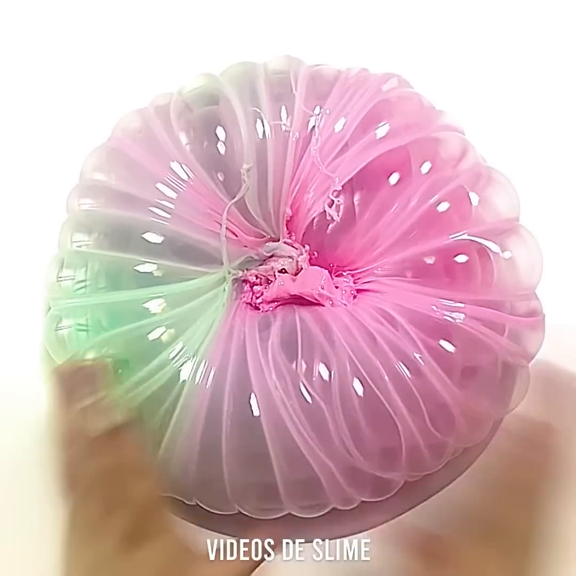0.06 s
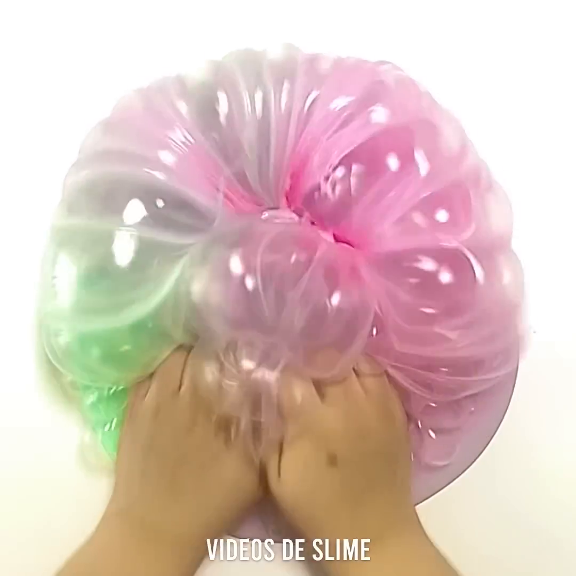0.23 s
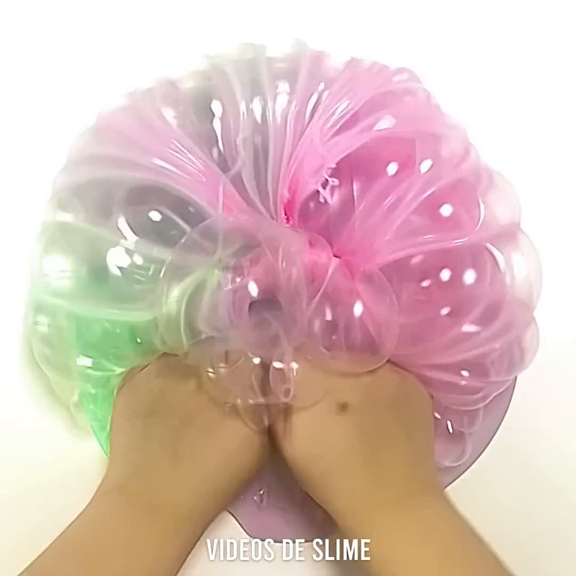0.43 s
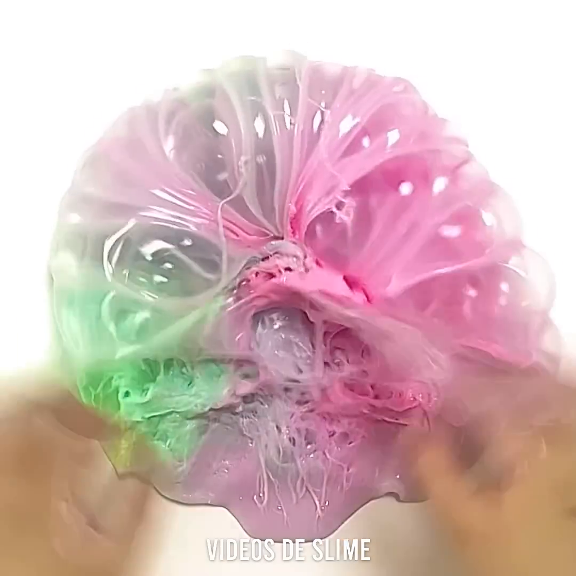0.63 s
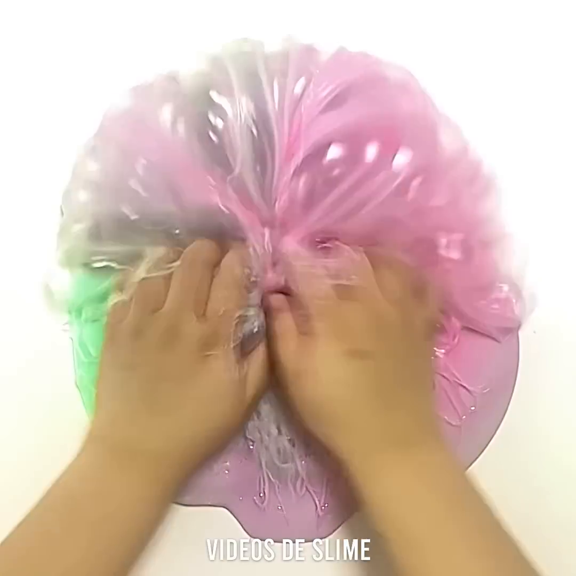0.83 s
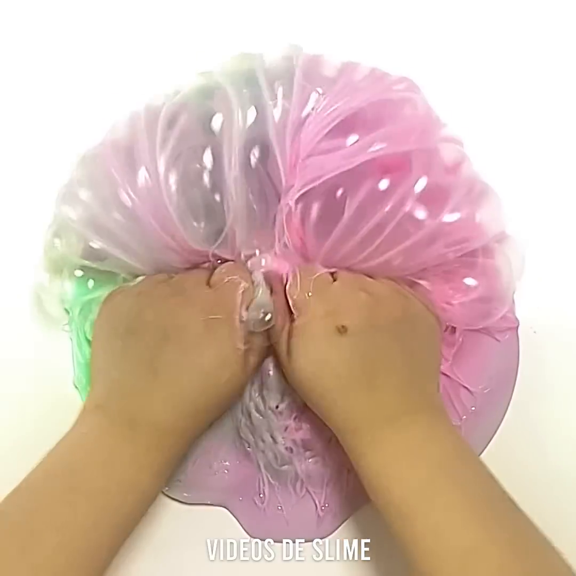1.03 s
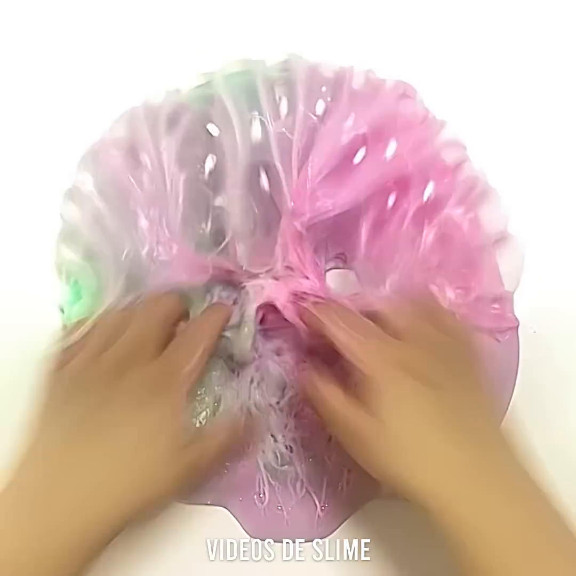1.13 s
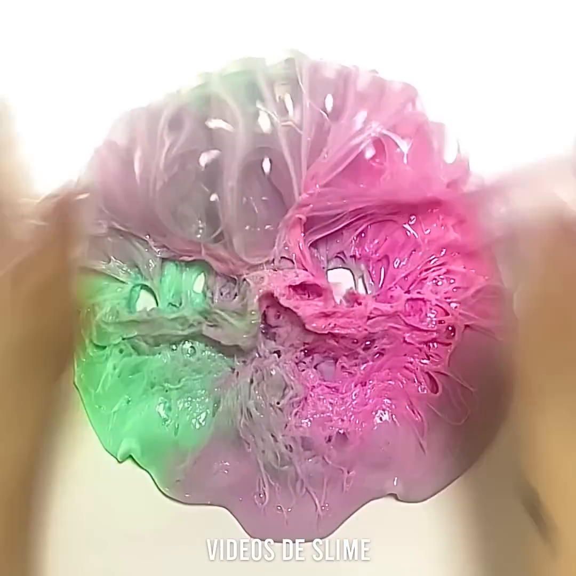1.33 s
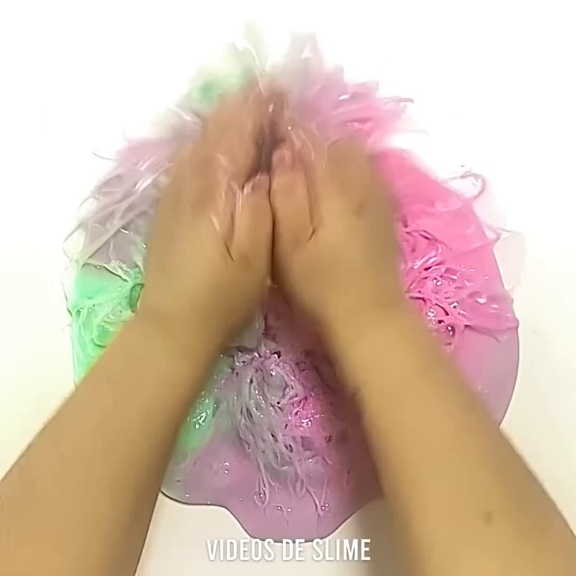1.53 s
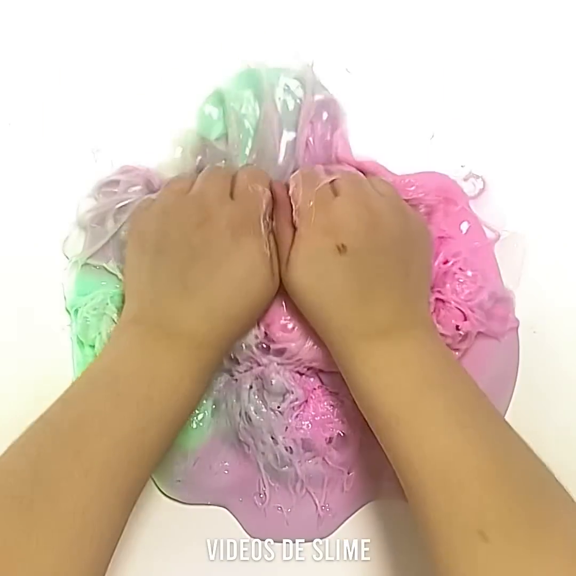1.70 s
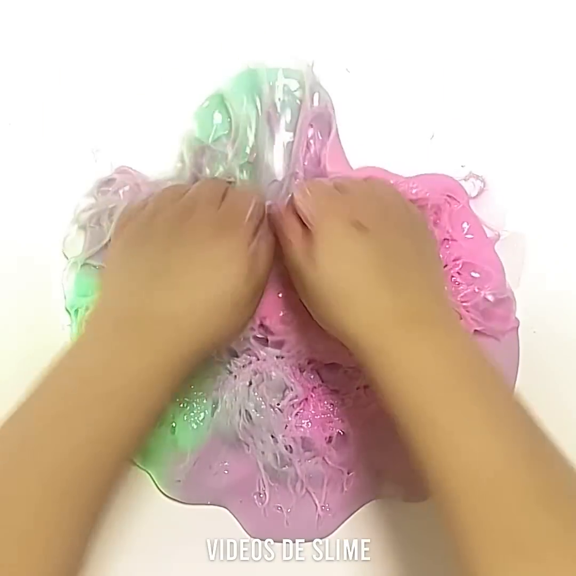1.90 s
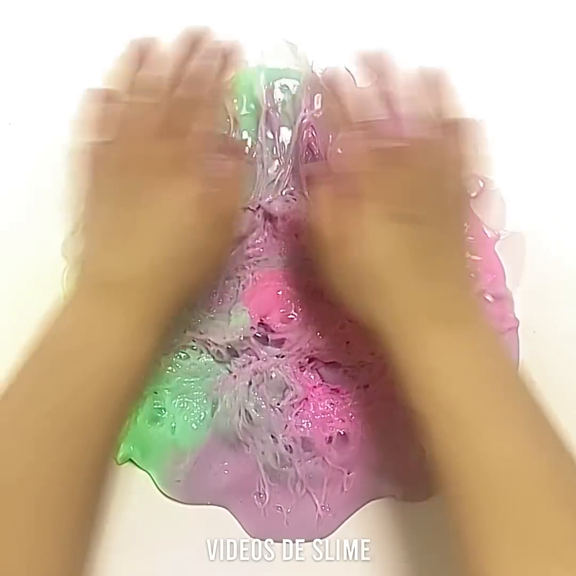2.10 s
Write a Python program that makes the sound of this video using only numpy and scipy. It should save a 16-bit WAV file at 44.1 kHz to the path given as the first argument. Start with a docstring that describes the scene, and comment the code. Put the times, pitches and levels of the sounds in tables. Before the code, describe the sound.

Air-filled slime is squeezed three times by hands on a table, each squeeze a dense wet crackle of bursting bubbles with snappy pops and brief squeaks, over dull low rumble; close microphone, small room.

```python
"""Slime squeezed three times by two hands on a table, close to the microphone in a small room.
Each squeeze bursts swarms of short, sinking bubble rings, with single louder pops on top.
Air pockets gulp on a downward glide, and escaping air squeaks as wavering tones.
Low noise rumbles as the mass pushes on the table; thuds and low knocks sound from the table.
A noise-like room tail follows the slime and table, over a faint steady background noise."""
import sys
import numpy as np
from scipy import signal
from scipy.fft import rfft, irfft
from scipy.io import wavfile
from scipy.ndimage import uniform_filter1d

SR = 44100
rng = np.random.default_rng(int(sys.argv[2]) if len(sys.argv) > 2 else 0)


def pcm_store(signal):
    """Save signal as 16-bit PCM."""
    levels = np.round(np.clip(np.atleast_2d(signal), -1, 1) * 32767)
    wavfile.write(sys.argv[1], SR, levels.astype(np.int16).T)


N = 94815

# crackle of each squeeze, before size trim: [t/s, level/dB of large, medium, small, finest bubbles]
SQUEEZE_1 = [(0.11, -82.5, -80.5, -83, -84), (0.19, -63.5, -58.5, -59.5, -68.5),
             (0.21, -47.5, -39.5, -49, -57.5), (0.238, -32.5, -35.5, -36.5, -41),
             (0.275, -33.5, -26, -37, -43.5), (0.289, -32.5, -35.5, -33.5, -38),
             (0.305, -44, -29.5, -37.5, -41), (0.328, -42.5, -23, -31.5, -39), (0.338, -39, -35, -39, -45),
             (0.362, -54.5, -37.5, -39, -47), (0.37, -43.5, -36, -53, -65), (0.398, -61.5, -41, -39, -49.5),
             (0.42, -55.5, -81, -78.5, -64), (0.455, -67, -47, -57, -61), (0.49, -53.5, -44, -46, -53.5),
             (0.54, -58.5, -50, -58.5, -60.5), (0.62, -73, -67.5, -73.5, -71)]
SQUEEZE_2 = [(0.777, -103, -76, -76.5, -99.5), (0.807, -62.5, -64, -64, -60), (0.835, -61, -55, -55, -60),
             (0.864, -49, -40.5, -51, -56), (0.886, -32.5, -31.5, -30.5, -37.5),
             (0.898, -47, -35, -41, -46), (0.909, -48.5, -32, -27, -35), (0.924, -28.5, -36.5, -39, -41),
             (0.931, -33.5, -31.5, -29.5, -43.5), (0.959, -37, -31, -34.5, -34),
             (0.977, -62, -39, -41, -50), (0.994, -50, -35, -35, -29.5), (1.024, -82, -59, -50.5, -52.5),
             (1.075, -78, -52.5, -56.5, -64), (1.106, -53.5, -44.5, -50, -55),
             (1.159, -64, -52.5, -60.5, -61.5), (1.201, -67.5, -61, -65.5, -75)]
SQUEEZE_3 = [(1.41, -90, -72.5, -78, -82), (1.449, -69, -67.5, -65.5, -72.5),
             (1.511, -89, -64.5, -63.5, -63.5), (1.559, -32, -58, -49.5, -51.5),
             (1.569, -64, -60, -62.5, -67), (1.621, -50.5, -53, -47.5, -55.5),
             (1.654, -42, -39.5, -42, -45), (1.683, -36, -30, -27.5, -44), (1.714, -44.5, -39.5, -37, -40),
             (1.755, -47.5, -38.5, -35, -34), (1.78, -44, -36.5, -35, -59.5),
             (1.797, -66, -44, -45.5, -45.5), (1.815, -66.5, -54, -59, -70),
             (1.875, -66, -57.5, -61.5, -66), (1.908, -56.5, -42.5, -41, -53),
             (1.929, -65.5, -51.5, -53.5, -52.5), (2.009, -70, -66.5, -69, -75.5)]
FADE_DB_PER_S = 117  # the sound rises into each squeeze and dies away after it, at this rate
# bubble sizes, large to finest:
# [lowest f/Hz, highest f/Hz, burst rate/(1/s), strength spread/dB, time to peak/cycles, trim/dB]
BUBBLE_SIZES = [(281, 945, 740, 3.5, 0.65, 1.5), (925, 2400, 1900, 1, 1.33, 0.5),
                (2606, 5730, 3100, 4, 1.3, 2), (5880, 15000, 3700, 2.5, 1.3, 1.5)]
# relative strength of a burst by its pitch: [f/Hz, level/dB]
BURST_COLOUR = [(260, -10), (450, -1), (900, -2), (1400, 0.5), (2400, -2), (3400, -3), (6000, -6),
                (8500, -6), (10500, -9), (15000, -18.5)]
BURST_SAG = 0.11  # a burst starts this share sharp and sinks towards half this share flat
# one tear sets off bubbles of all sizes, over a steady bed
CLUMPS_PER_S, CLUMP_DECAY_S, CLUMP_BED = 200, 0.0029, 0.74

# single loud bubbles, before the pop and snap trims:
# [t/s, ring level/dB, f/Hz, length scale/s, film snap level/dB]
POPS = [(.163, -48, 3270, .0009, -56), (.209, -33, 1340, .002, -48), (.2295, -26, 1900, .001, -38),
        (.234, -17, 1080, .0006, -27), (.2712, -21, 1450, .0012, -33), (.2943, -13, 1660, .0015, -28),
        (.2983, -18, 2930, .0012, -26), (.3048, -13, 1610, .002, -39), (.3191, -19, 5750, .0012, -27),
        (.3212, -15, 2030, .0028, -29), (.343, -17, 1570, .0028, -38), (.3774, -19, 4260, .001, -25),
        (.4675, -33, 2540, .002, -40), (.4995, -32, 1520, .0035, -45), (.4998, -27, 5600, .0014, -39),
        (.5001, -25, 2990, .0036, -41), (.8142, -40, 1060, .001, -46), (.849, -33, 1100, .002, -48),
        (.8795, -21, 980, .002, -40), (.8826, -21, 2990, .0016, -30), (.9015, -22, 3080, .0005, -29),
        (.9105, -15, 1420, .0019, -30), (.9107, -16, 3450, .0012, -32), (.9302, -20, 6570, .0015, -26),
        (.9325, -22, 1100, .0025, -37), (.9562, -19, 2120, .002, -35), (.9567, -16, 3400, .0018, -31),
        (.9875, -25, 1270, .0012, -28), (.9898, -21, 1400, .0018, -30), (.9956, -21, 6180, .0005, -25),
        (.9957, -20, 11500, .0007, -30), (1.0116, -27, 1530, .0009, -27), (1.2165, -43, 4400, .001, -53),
        (1.2328, -38, 1310, .002, -62), (1.2329, -40, 2500, .0013, -55), (1.2813, -44, 6240, .0009, -48),
        (1.5305, -33, 4600, .0012, -38), (1.551, -34, 3660, .0012, -44), (1.6326, -26, 1530, .001, -37),
        (1.6476, -28, 1440, .0012, -39), (1.662, -25, 2050, .0022, -42), (1.6735, -11, 3880, .0009, -24),
        (1.674, -19, 2050, .0013, -36), (1.6788, -15, 2110, .0006, -27), (1.6809, -20, 3420, .0025, -37),
        (1.7107, -18, 3420, .0007, -22), (1.7214, -21, 5190, .0006, -24), (1.7543, -22, 8250, .0012, -28),
        (1.763, -23, 1450, .0016, -32), (1.7771, -21, 3400, .0018, -29), (1.7882, -14, 3340, .0009, -21),
        (1.8005, -24, 5100, .0011, -26), (1.8665, -37, 3410, .0008, -47), (1.8937, -32, 1340, .0015, -53),
        (2.006, -45, 600, .008, -66)]
POP_TRIM_DB, SNAP_TRIM_DB = 1.0, 3
POP_PEAK_SHARE = 0.33  # time to peak, as a share of the length scale
POP_SAG = 0.18  # starts this share sharp, sinks towards half this share flat
SNAP_LOW_HZ, SNAP_HIGH_HZ, SNAP_RISE_S = 1830, 10100, 0.0001

# air pockets that open, and low table knocks near 100 Hz at .937 and .992, before the ragged flutter:
# [t/s, level/dB, start f/Hz, end f/Hz, glide/s, time to peak/s, snap level/dB]
GULPS_AND_KNOCKS = [(.2425, -28.5, 793, 292, .004, 0.0054, -45),
                    (.5005, -32.5, 1510, 564, 0.0014, 0.0032, -47),
                    (.9105, -27, 1084, 350, 0.0022, 0.0035, -48), (.937, -32, 146, 99.8, .006, 0.02, -61),
                    (.992, -33.5, 132, 100, 0.0067, .014, -59),
                    (1.216, -39, 1495, 132.4, .0034, 0.012, -53),
                    (1.5432, -36, 1490, 802, 0.0015, 0.0016, -49.5),
                    (1.5535, -33.5, 1220, 280, 0.00794, 0.0023, -42.5),
                    (1.5817, -36.5, 1507, 544, 0.0012, 0.0034, -64),
                    (1.5885, -24, 3360, 386, 0.000974, 0.0028, -36),
                    (1.6019, -22.5, 3370, 367, 0.00109, 0.0032, -41.5),
                    (1.6153, -28, 2670, 350, .0019, 0.002, -55.5),
                    (2.0095, -46, 1290, 110, .0027, 0.013, -53.5)]
GULP_SHAPE = 1.1  # exponent on the swell
GULP_RAGGED, GULP_RAGGED_HZ = 0.3, 895  # flutter depth (rms) and its top frequency
GULP_CLOSE = 2.4  # the ring collapses after this many times its time to peak
GULP_OVERTONE, GULP_OVERTONE_DB = 2.3, -13  # pitch ratio, level relative to the main ring

# air through a narrow hole: [t/s, length/s, level/dB, start f/Hz, end f/Hz]
SQUEAKS = [(.236, 0.052, -31, 1130, 1158), (.264, 0.019, -24.5, 512, 710), (.275, 0.045, -30, 2780, 2850),
           (.298, .018, -21.5, 1618, 1536), (.349, .018, -32.5, 1470, 1660), (.355, 0.011, -32, 7970, 7500),
           (.925, 0.034, -28.5, 435, 414), (.93, 0.032, -31.5, 1520, 1277),
           (1.743, 0.013, -25.5, 1930, 2190)]
SQUEAK_WAVER = 0.023  # typical pitch deviation, as a share

# the mass pushing on the table, bass before trim, one curve per squeeze: [t/s, level/dB]
PUSHES = [
    [(0.15, -109), (0.204, -58), (0.244, -50.5), (0.32, -41.5), (0.398, -53), (0.44, -70), (0.6, -63.5)],
    [(0.8, -79.5), (0.885, -48.5), (0.916, -43), (0.948, -43.5), (0.998, -45.5), (1.076, -65), (1.2, -65.5)],
    [(1.5, -72.5), (1.536, -70.5), (1.548, -64.5), (1.71, -39.5), (1.878, -72.5), (1.908, -63.5),
     (1.98, -65)],
]
# relative spectrum of the push rumble: [f/Hz, level/dB per Hz]
PUSH_COLOUR = [(25, -41), (50, -16), (65, -6), (82, -1), (103, 0), (130, -2.5), (175, -4), (240, -8.5),
               (400, -24.5), (1000, -70.5)]
PUSH_TRIM_DB = 2
# the mass drops back on the table as the hands let go, before mode levels: [t/s, level/dB]
THUDS = [(1.224, -46), (1.275, -55.5), (2.017, -52)]
# resonances of the table, relative levels: [f/Hz, level/dB, t60/s]
TABLE_MODES = [(77.3, -4.5, 0.27), (114, 2.5, 0.16), (173.4, -2, 0.25), (241, -3, 0.174)]
THUD_RISE_S = 0.0007

# how long the room rings: [f/Hz, t60/s]
ROOM_T60 = [(60, .7), (150, 0.29), (400, 0.48), (1500, 0.48), (4000, 0.47), (9000, 0.35), (16000, 0.81)]
# how strongly the room answers: [f/Hz, level/dB]
ROOM_SEND = [(60, -6), (120, -7), (180, -8), (260, -34.5), (500, -6.5), (1000, -12), (4000, -15),
             (9000, -14.5), (16000, -16)]
# relative spectrum of the background noise: [f/Hz, level/dB per Hz]
FLOOR_COLOUR = [(15, -52.5), (25, -12.5), (82, -1), (200, -7.5), (349, -16), (1340, -24.5), (2850, -27),
                (15500, -40.5)]
FLOOR_DB = -71
# tone of the microphone: [f/Hz, level/dB]
MIC_COLOUR = [(20, -14), (45, -16), (70, -3), (9000, -3), (12000, -8.5), (16000, -6)]
EDGE_HZ = 16000  # top of the recorder's band


def amp(db):
    """Decibels to gain."""
    return 10 ** (np.asarray(db) / 20)


def evened(x):
    """Scales to rms 1."""
    return x / np.sqrt(np.mean(x ** 2) + 1e-20)


def read(points, hz):
    """Reads a table along log frequency."""
    f, value = np.transpose(points)
    return np.interp(np.log(hz + 1), np.log(f + 1), value)


def add(mix, s, sound):
    """Mixes a sound in at time s."""
    part = mix[round(s * SR):][:len(sound)]
    part += sound[:len(part)]


def levels(curves, column):
    """Gain over time: the loudest of several level curves, each fading away beyond its ends."""
    t = np.arange(N) / SR
    gain = np.zeros(N)
    for curve in map(np.array, curves):
        outside_s = np.maximum(curve[0, 0] - t, 0) + np.maximum(t - curve[-1, 0], 0)
        db = np.interp(t, curve[:, 0], curve[:, column]) - FADE_DB_PER_S * outside_s
        gain = np.maximum(gain, amp(db))
    return gain


def noise(colour):
    """Steady noise of a given spectrum, at rms 1."""
    spectrum = rfft(rng.standard_normal(N))
    return evened(irfft(spectrum * amp(read(colour, np.fft.rfftfreq(N, 1 / SR))), N))


def bubble(start_hz, end_hz, glide_s, peak_s, shape=1):
    """A ring, as of an opening cavity: it swells, dies away and glides in pitch."""
    t = np.arange(0, 10 * peak_s, 1 / SR)
    hz = end_hz + (start_hz - end_hz) * np.exp(-t / glide_s)
    swell = (t / peak_s * np.exp(1 - t / peak_s)) ** shape
    return swell * np.sin(2 * np.pi * np.cumsum(hz) / SR)


def swarm(low_hz, high_hz, rate, spread_db, cycles, trim_db, count=18):
    """Bubbles of one size class burst at random moments with uneven strength."""
    out = np.zeros(N)
    for hz in np.geomspace(low_hz, high_hz, count):
        strength = amp(spread_db * np.minimum(rng.exponential(1, N), 3.5))
        polarity = rng.choice([-1, 1], N)
        bursts = strength * polarity * (rng.random(N) < rate / count / SR)
        ring = bubble(hz * (1 + BURST_SAG), hz * (1 - BURST_SAG / 2), 2 * cycles / hz, cycles / hz)
        ring /= np.linalg.norm(ring)  # equal energy at every pitch
        out += amp(read(BURST_COLOUR, hz)) * signal.oaconvolve(bursts, ring)[:N]
    return amp(trim_db) * evened(out)


def crackle():
    """Four swarms burst in shared, decaying clumps and swell and fade with each squeeze."""
    tears = (rng.random(N) < CLUMPS_PER_S / SR) * rng.uniform(0.62, 1, N)
    trails = signal.lfilter([1], [1, -np.exp(-1 / SR / CLUMP_DECAY_S)], tears)
    clumps = evened(CLUMP_BED + trails)
    squeezes = [SQUEEZE_1, SQUEEZE_2, SQUEEZE_3]
    bursts = np.zeros(N)
    for column, size in enumerate(BUBBLE_SIZES, 1):
        bursts += swarm(*size) * levels(squeezes, column)
    return clumps * bursts


def snap(length_s):
    """A brief bright puff of noise, as of a tearing film."""
    t = np.arange(1024) / SR
    film = signal.butter(2, [SNAP_LOW_HZ, SNAP_HIGH_HZ], "band", fs=SR, output="sos")
    puff = evened(signal.sosfilt(film, rng.standard_normal(len(t))))
    return puff * np.exp(-t / length_s) * (1 - np.exp(-t / SNAP_RISE_S))


def pops():
    """The film of a bubble snaps and its cavity rings briefly, sinking in pitch."""
    out = np.zeros(N)
    for s, db, hz, length, snap_db in POPS:
        ring = bubble(hz * (1 + POP_SAG), hz * (1 - POP_SAG / 2), length / 2, length * POP_PEAK_SHARE)
        add(out, s, amp(db + POP_TRIM_DB) * ring)
        add(out, s, amp(snap_db + SNAP_TRIM_DB) * snap(length))
    return out


def gulps_and_knocks(snap_s=0.0015):
    """Air pockets, and two low table knocks, ring on a ragged downward glide with a weak overtone."""
    out = np.zeros(N)
    lowpass = signal.butter(2, GULP_RAGGED_HZ, fs=SR, output="sos")
    flutter = evened(signal.sosfilt(lowpass, rng.standard_normal(N)))
    for s, db, start_hz, end_hz, glide_s, peak_s, snap_db in GULPS_AND_KNOCKS:
        ring = bubble(start_hz, end_hz, glide_s, peak_s, GULP_SHAPE)
        overtone = bubble(start_hz * GULP_OVERTONE, end_hz * GULP_OVERTONE, glide_s, peak_s, GULP_SHAPE)
        t = np.arange(len(ring)) / SR
        collapse = np.exp(-(t / peak_s / GULP_CLOSE) ** 4)
        add(out, s, amp(db) * (ring + amp(GULP_OVERTONE_DB) * overtone) * collapse)
        add(out, s, amp(snap_db) * snap(snap_s))
    return out * (1 + GULP_RAGGED * flutter)


def squeaks():
    """Escaping air sings for a moment on a gliding, wavering pitch."""
    out = np.zeros(N)
    for s, length, db, start_hz, end_hz in SQUEAKS:
        t = np.arange(0, length, 1 / SR)
        waver = evened(uniform_filter1d(rng.standard_normal(8192), size=128))[:len(t)]
        hz = np.geomspace(start_hz, end_hz, len(t)) * (1 + SQUEAK_WAVER * waver)
        swell = np.sin(np.pi * t / length)
        add(out, s, amp(db) * swell * np.sin(2 * np.pi * np.cumsum(hz) / SR))
    return out


def pushes():
    """Dull rumble of the mass pressed against the table: low noise following each push."""
    return amp(PUSH_TRIM_DB) * noise(PUSH_COLOUR) * levels(PUSHES, 1)


def thuds():
    """A soft blow rings the low modes of the table, each decaying at its own rate."""
    out = np.zeros(N)
    t = np.arange(SR // 2) / SR
    ring = np.zeros(len(t))
    for hz, db, t60 in TABLE_MODES:
        ring += amp(db) * np.exp(-np.log(1000) * t / t60) * np.sin(2 * np.pi * hz * t)
    ring *= np.minimum(t / THUD_RISE_S, 1)
    for s, db in THUDS:
        add(out, s, amp(db) * ring)
    return out


def room(x, rise_s=0.012):
    """A diffuse noise tail, each band with its own strength and decay."""
    hz, t, bands = signal.stft(rng.standard_normal(SR), SR, nperseg=1024)
    t60 = read(ROOM_T60, hz)[:, None]
    decay = np.exp(-np.log(1000) * t / t60)
    decay *= np.sqrt(2 * np.log(1000) / t60 / SR)  # evens the energy of long and short decays
    send = amp(read(ROOM_SEND, hz))[:, None]
    tail = signal.istft(bands * decay * send, SR, nperseg=1024)[1]
    tail *= np.minimum(np.arange(len(tail)) / SR / rise_s, 1)
    return signal.fftconvolve(x, tail)[:N]


def background():
    """Faint steady noise, weighted to the bass."""
    return amp(FLOOR_DB) * noise(FLOOR_COLOUR)


def scene():
    """The slime and the table, their room and a faint background."""
    slime = crackle() + pops() + gulps_and_knocks() + squeaks()
    bass = pushes() + thuds()
    close = slime + bass
    return (close + room(close) + background())[None]


def record(dry):
    """The microphone's colour and the recorder's band limit."""
    colour = amp(read(MIC_COLOUR, np.fft.rfftfreq(2 * N, 1 / SR)))
    heard = irfft(rfft(dry, 2 * N) * colour)[:, :N]
    band_limit = signal.firwin(511, EDGE_HZ, window=("kaiser", 9), fs=SR)
    return signal.oaconvolve(heard, band_limit[None], "same")


dry = scene()
out = record(dry)
pcm_store(out)
```